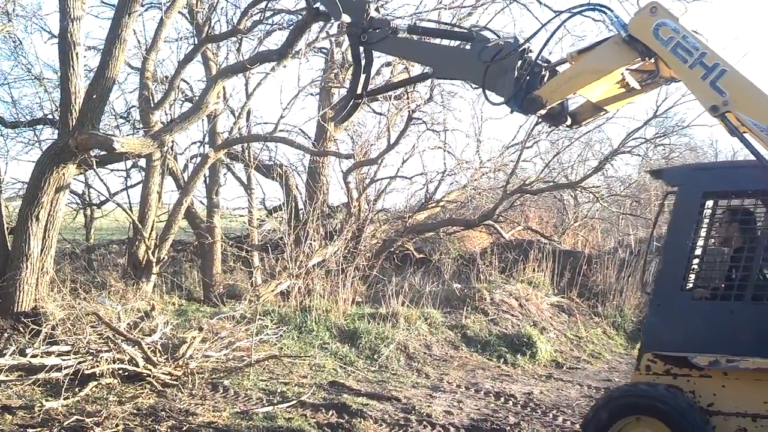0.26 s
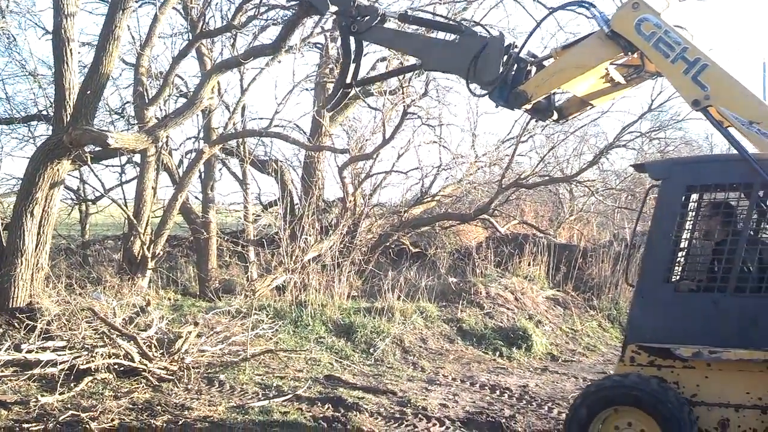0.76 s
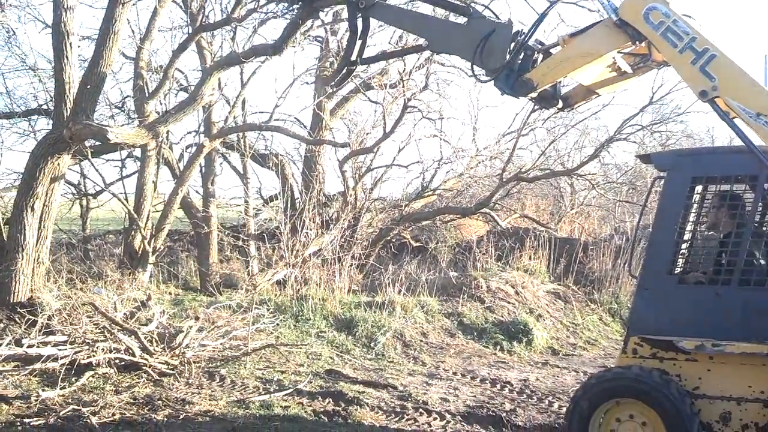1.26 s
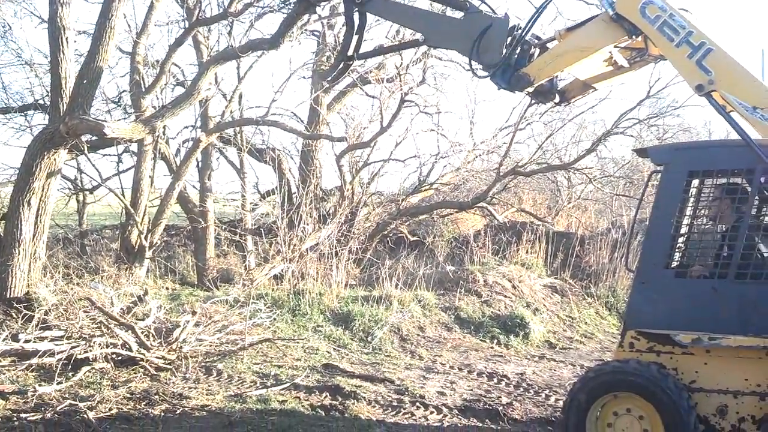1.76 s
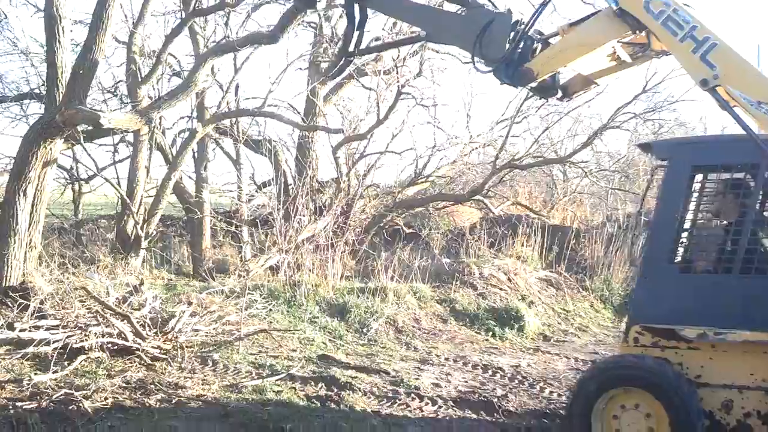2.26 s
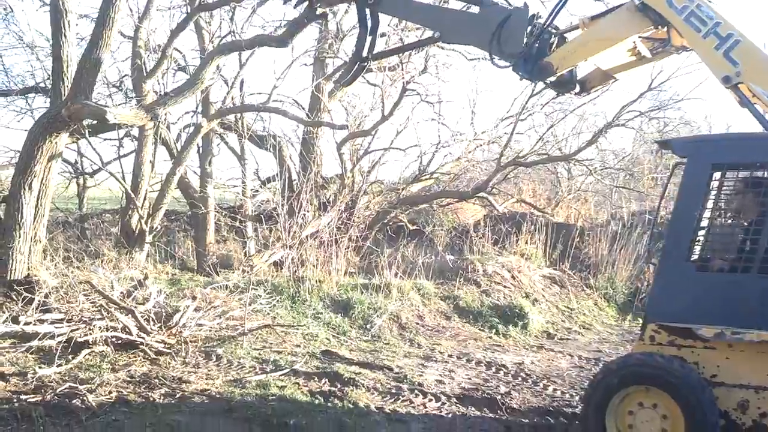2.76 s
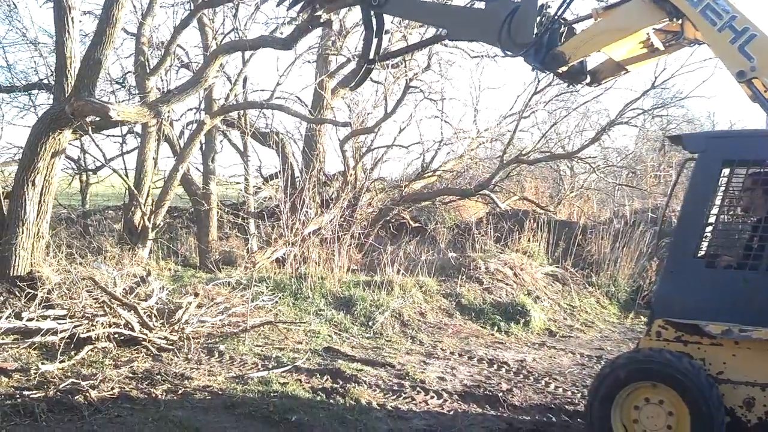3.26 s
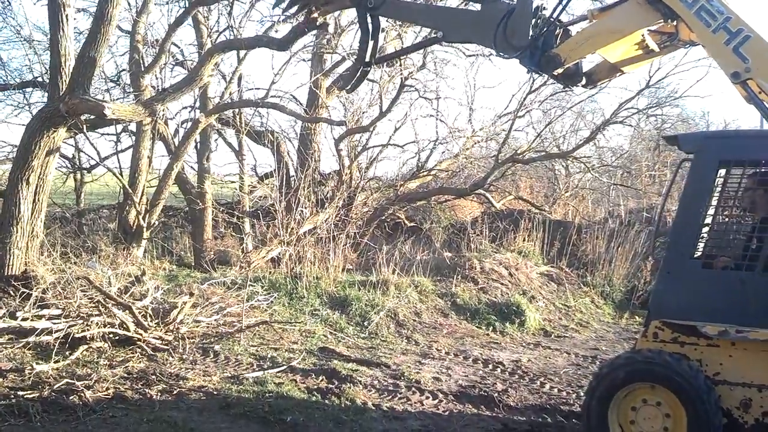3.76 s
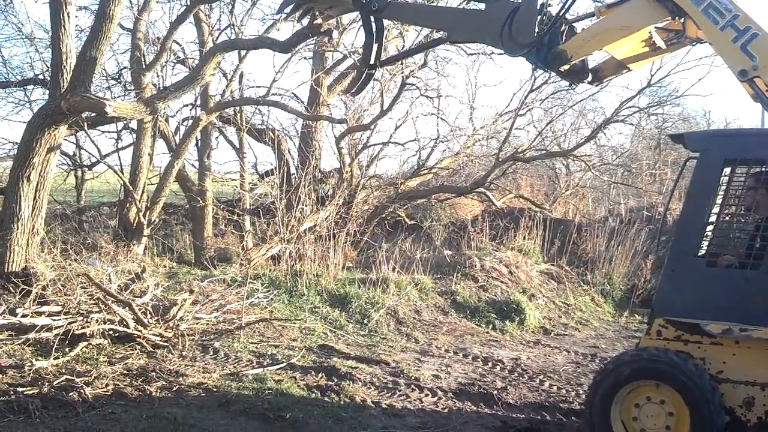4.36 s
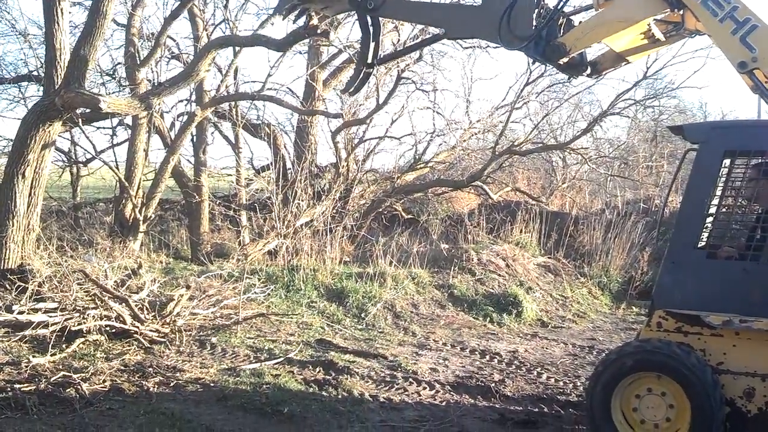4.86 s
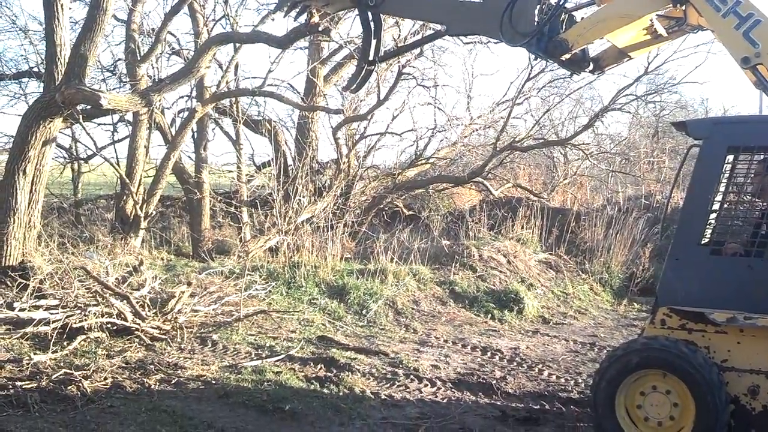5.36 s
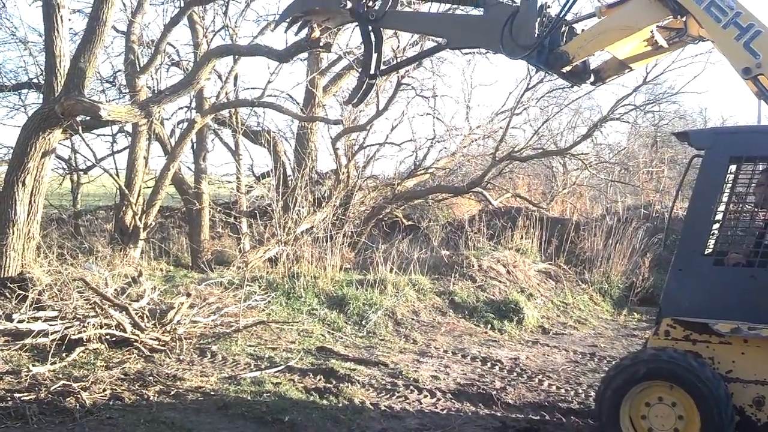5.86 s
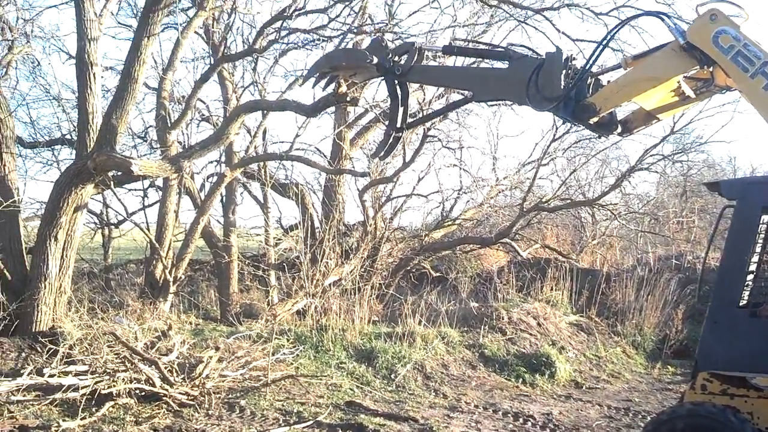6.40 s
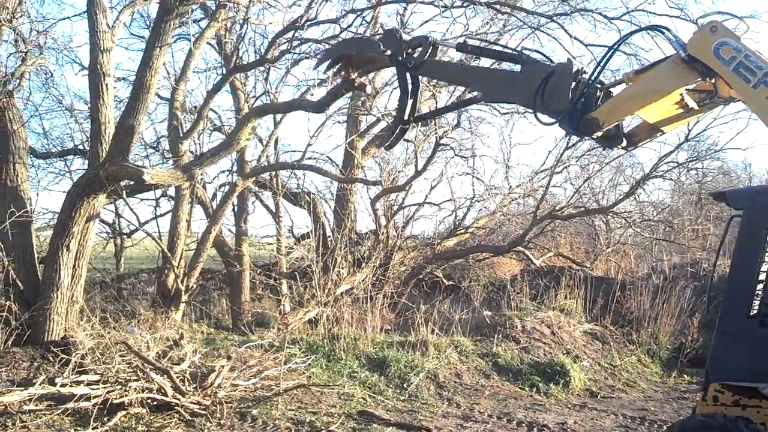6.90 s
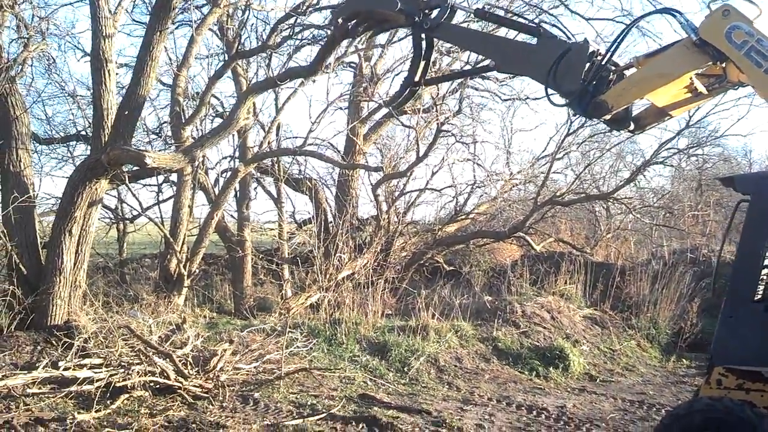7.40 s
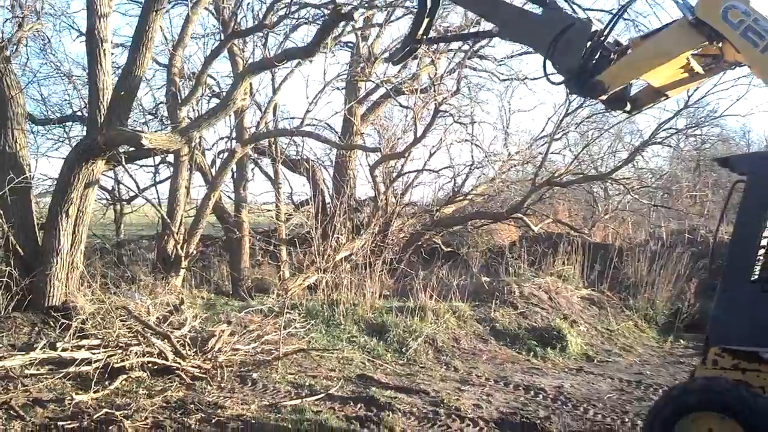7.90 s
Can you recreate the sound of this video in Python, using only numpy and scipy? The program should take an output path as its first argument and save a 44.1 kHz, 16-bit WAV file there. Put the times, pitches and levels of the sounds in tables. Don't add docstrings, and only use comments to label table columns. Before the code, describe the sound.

Outdoors, a few metres from a small stereo camera microphone, a four-cylinder diesel loader throbs and roars throughout. Hydraulics whine as its arm moves and the steel claw clanks early on. Then dead branches snap and crack in a dense burst, the engine dipping in level after each loud peak. Breakage thins to small twig ticks, then one late clank with a snap, and the hydraulic whine rises again. Light wind buffets the microphone.

```python
import sys
import numpy as np
from scipy import signal
from scipy.fft import rfft, irfft
from scipy.io import wavfile
from scipy.ndimage import uniform_filter1d

SR = 44100
rng = np.random.default_rng(int(sys.argv[2]) if len(sys.argv) > 2 else 0)


def inscribe(sig):
    pcm = np.round(np.clip(np.atleast_2d(sig).T, -1, 1) * 32767)
    wavfile.write(sys.argv[1], SR, pcm.astype(np.int16))


def boost_factor(decibels):
    exponent = np.asarray(decibels, float) / 20
    return 10 ** exponent


N = 358974
HZ = np.fft.rfftfreq(N, 1 / SR)


def evened(x):
    return x / np.sqrt(np.mean(x ** 2) + 1e-20)


def read(points, hz, column=1):
    table = np.transpose(points)
    return np.interp(np.log(hz + 1), np.log(table[0] + 1), table[column])


def along(rows):
    s, *columns = np.transpose(rows)
    return [np.interp(np.arange(N) / SR, s, c) for c in columns]


def coloured(x, points):
    return irfft(rfft(x) * boost_factor(read(points, HZ)), N)


def drift(hz):
    grid = np.arange(0, N + 128, 128)
    f = np.fft.rfftfreq(len(grid), 128 / SR)
    slow = irfft(rfft(rng.standard_normal(len(grid))) / (1 + (f / hz) ** 4), len(grid))
    return np.interp(np.arange(N), grid, evened(slow))


def tone(hz):
    return np.sqrt(2) * np.sin(2 * np.pi * (np.cumsum(hz) / SR + rng.random()))


def add(mix, s, sound):
    part = mix[..., round(s * SR):][..., :sound.shape[-1]]
    part += sound[..., :part.shape[-1]]


# time in seconds, depth in dB.
DUCKS = [(0, 2), (0.678, 1.5), (.845, 4.5), (1.29, 3), (1.73, 2.5), (1.76, 4), (1.796, 6.5), (2.047, 6),
         (2.45, 4), (2.59, 15.5), (3.16, 14), (3.412, 16), (3.98, 17), (4.475, 15.5), (4.92, 11),
         (6.85, 2.5), (7.116, 4.5), (7.45, 4)]


def ducking_db():
    t, gain_db = np.arange(N) / SR, np.zeros(N)
    for s, depth_db in DUCKS:
        since = np.maximum(t - s, 0)
        quick_db = 0.15 * depth_db * (1 - np.exp(-since / 0.054))
        climb_db = 8 * since
        gain_db = np.minimum(gain_db, (t >= s) * (quick_db + climb_db - depth_db))
    return uniform_filter1d(gain_db, size=400)


# start in seconds, length in seconds, level in dB.
PULLS = [
    (0, .5, -5),
    (.84, .58, 0),
    (1.6, .2, -5),
    (2.42, .27, 1),
    (3.03, .45, -2),
    (3.9, .9, -5),
    (5.95, .5, -6),
    (6.82, .47, 0),
    (7.3, .25, -6),
    (7.52, .7, -3.5),
]


def pull():
    t, rise_s = np.arange(N) / SR, .1
    return sum(boost_factor(db) * np.clip(np.minimum(t - s, s + length - t) / rise_s, 0, 1) for s, length, db in PULLS)


# time in seconds, exhaust tone in Hz (4 x shaft speed).
SPEED = [(0.0, 119.9), (0.91, 116.7), (1.36, 116.6), (1.59, 119.6), (2.56, 117), (3.02, 121.1),
         (3.19, 116.2), (3.42, 116.2), (3.56, 119.5), (3.83, 119.4), (3.97, 117.2), (4.71, 118.1),
         (4.85, 119.1), (6.55, 119.1), (6.89, 116.1), (7.42, 117.4), (7.85, 115.6), (8.14, 116.5)]


def crank():
    hz = along(SPEED)[0]
    return hz, np.cumsum(hz / 2) / SR


# multiple of half the exhaust tone, level in dB.
ORDERS_DB = [(1.001, -20.5), (1.251, -20.5), (2.75, -14), (3, -10), (3.25, -10), (3.499, -18), (4, -4),
             (4.251, -13.5), (4.75, -13.5), (5, -10), (5.249, -30), (5.75, -6), (6, -4), (6.249, -5),
             (6.498, -7)]


def exhaust(roar_db, hz, firing):
    sag_hz = 119 - hz
    tone_db = roar_db - 3.5 + 0.16 * sag_hz + 1.4 * drift(hz=1.15)
    pipe_db = roar_db - 9 + 2.8 * np.clip(sag_hz - .8, 0, 3)
    lines = boost_factor(tone_db + 14.5) * tone(hz)
    for k, db in ORDERS_DB:
        booms = 2.4 < k < 5.4 and k != 4
        level_db = pipe_db + 18.5 if booms else roar_db + 6.0
        throb = 2.88 / k * np.cos(2 * np.pi * k * firing - k ** 2)
        lines += boost_factor(level_db + db + 2.8 * drift(hz=3)) * throb
    boom = np.cos(2 * np.pi * 3 * firing - 9)
    return lines + boost_factor(roar_db + 8.5) * pull() * boom


# frequency in Hz, level in dB per Hz.
ROAR = [(45, -31), (90, 4.5), (180, 12.5), (280, 13), (370, 10.5), (430, -3.5), (520, 2.5), (660, -4.5),
        (800, -4), (1000, -7), (1300, -15), (1550, -10), (1900, -17), (2600, -30.5)]
# frequency in Hz, level in dB per Hz.
HISS = [(1200, -39), (2000, 12), (3000, 7.5), (4000, 9), (6000, 4.5), (8000, -4), (12000, -33),
        (16000, -38.5)]
# pitch in Hz at 119 Hz exhaust tone, level in dB over the roar.
GEARS = [(598, -12), (629, -13), (780, -12), (882, -14), (1034, -14), (1140, -8), (1199, -7), (1496, -8),
         (1555, -14), (4075, -19)]
# frequency in Hz, level in dB over the roar.
PANELS = [(1410, -10), (1632, -10), (1696, -15)]
# frequency in Hz, width in Hz, level in dB.
CASING = [(570, 130, -7), (797, 60, -3), (1140, 70, -11), (1490, 110, -5), (1640, 70, -6), (4200, 460, -12)]


def block(roar_db, hz, firing):
    strength = boost_factor(1.7 * rng.standard_normal(600))[firing.astype(int)]
    swell = strength * np.exp(-(firing % 1) / 0.48)
    cycle = np.interp(firing / 4 % 1, np.linspace(0, 1, num=3000), rng.standard_normal(3000))
    noise = rng.standard_normal((2, N))
    noise[0] += .85 * evened(cycle)
    roar = evened(coloured(noise * (1 + 0.46 * swell), ROAR))
    hiss = evened(coloured(rng.standard_normal((2, N)) * (1 + 0.62 * swell), HISS))
    roar = coloured(roar, [(140, 0), (170, -7), (390, -8), (440, 0)])
    gears = np.zeros(N)
    for f, db in GEARS:
        gears += boost_factor(db - 20 + 3.5 * drift(hz=4)) * tone(f * hz / 119 + 1.2 * drift(hz=8))
    roar[0] += (1 - .6 * np.minimum(pull(), 1)) * gears
    for f, db in PANELS:
        roar[0] += boost_factor(db - 22 + 3 * drift(hz=6)) * tone(f + 1.5 * drift(hz=8))
    casing = 1 + sum(boost_factor(db) / (1 + (2 * (HZ - f) / width) ** 2) for f, width, db in CASING)
    return boost_factor(roar_db) * irfft(rfft(boost_factor(6.5) * roar + boost_factor(-13.5) * hiss) * casing, N)


def engine(roar_db):
    hz, firing = crank()
    out = block(roar_db, hz, firing)
    out[0] += exhaust(roar_db, hz, firing)
    return out


# time in seconds, level in dB, pitch in Hz.
PUFFS = [(0.197, -22, 142), (0.82, -18, 167), (0.843, -16, 182), (0.898, -13, 182), (0.954, -15, 202),
         (1.286, -17, 147), (1.442, -17, 201), (1.729, -15, 152.9), (1.758, -14, 228), (1.798, -15.8, 159),
         (2.044, -15, 172), (2.938, -18, 122), (3.003, -19, 123), (3.045, -20, 164), (3.061, -18, 151.2),
         (4.07, -26, 216.2), (4.661, -25, 188.6), (4.752, -26, 152), (4.863, -20, 189.2),
         (4.987, -24, 143.4), (5.135, -24, 135), (5.172, -24, 139), (5.399, -18, 148), (5.537, -20, 143),
         (5.572, -21, 158), (5.786, -17, 151.8), (5.865, -21, 157.5), (5.934, -21, 138.8),
         (6.224, -19, 150), (7.449, -20, 157), (2.45, -17, 230), (1.665, -18, 200)]
# frequency in Hz, level in dB per Hz.
BREEZE = [(40, 0), (80, -4), (150, 6), (250, 0), (450, -14), (1000, -60)]


def wind(roar_db):
    t, out = np.arange(-900, 900) / SR, np.zeros((2, N))
    for s, db, hz in PUFFS:
        phase, port = rng.random(2)
        thump = np.exp(-(t * hz / 0.55) ** 2) * np.cos(2 * np.pi * (hz * t * (1 - 18 * t) + phase))
        push = np.roll([[1], [-.3]], int(2 * port))
        add(out, s - .02, boost_factor(db + 6.5) * push * thump)
    lumps = boost_factor(6.6 * np.minimum([drift(hz=8.1), drift(hz=21.0)], 1.4))
    breeze = evened(coloured(rng.standard_normal((2, N)), BREEZE) * lumps)
    calm_db = -7.5 * np.clip((np.arange(N) / SR - 6.3) / .2, 0, 1)
    return out + boost_factor(roar_db + 1.5 + calm_db) * breeze


def whine(rows, lift_db, rise_s, fall_s, settle_hz=0):
    clock, level, pitch = np.arange(N) / SR, np.zeros(N), np.zeros(N)
    for start, length, hz, glide, db in rows:
        t = clock - start
        shape = np.clip(np.minimum(t / rise_s, (length - t) / fall_s), 0, 1)
        level += shape * boost_factor(db + lift_db)
        pitch += (shape > 0) * (hz + glide * t + settle_hz * np.exp(-abs(t) / .09))
    return level * boost_factor(2.2 * drift(hz=30)) * tone(pitch + 1.3 * drift(hz=5))


# start in seconds, length in seconds, pitch in Hz, glide in Hz per second, level in dB.
LIFT = [
    (.11, .735, 541, -21, -32.5),
    (.851, .55, 526, -8, -44),
    (7.95, .4, 525, -20, -33),
]


def lift_pump():
    return whine(LIFT, lift_db=5.0, rise_s=0.21, fall_s=0.04)


# time of peak in seconds, level in dB, rise in seconds, fall in seconds.
RUSTLE = [(.8, -48.5, 2.5, 0.95), (1.1, -33, 0.027, 0.052), (2.44, -31, 0.034, 0.055),
          (2.6, -34, 0.075, 0.055), (2.65, -45, .05, 1.05), (3.19, -37, .07, 0.19),
          (3.29, -35.5, 0.04, 0.09), (3.48, -37.5, 0.17, 0.07), (3.985, -38, .015, .07),
          (4.03, -42, .04, .3), (4.486, -37, .01, .03), (4.93, -44, 0.93, 0.37), (5.14, -44.5, .2, 2.17),
          (6.05, -45, .03, .03), (7.12, -35, 0.018, 0.062), (7.3, -48, .1, 5)]


def rustle():
    t = np.arange(N) / SR
    swells_db = [db - 12 * np.maximum((s - t) / rise, (t - s) / fall) for s, db, rise, fall in RUSTLE]
    level = np.maximum(boost_factor(np.max(swells_db, axis=0)) - boost_factor(-51.0), 0)
    happens = rng.random(N) < 1100 / SR
    size = boost_factor(2.8 * np.minimum(rng.exponential(1, N), 3)) * happens
    grains = evened(signal.lfilter([1], [1, -.985], size)) * rng.standard_normal((2, N))
    colour = [(400, -13.5), (1200, 12.5), (3000, 1), (6000, 0.5), (10000, -4), (16000, -9)]
    return level * evened(coloured(grains, colour))


# start in seconds, length in seconds, pitch in Hz, glide in Hz per second, level in dB.
HOSE = [
    (.58, .84, 387.6, -11, -43.5),
    (6.45, 0.86, 382, -7.5, -50),
    (7.75, .4, 366, 8, -49),
]


def hose():
    return whine(HOSE, lift_db=6.5, rise_s=0.29, fall_s=0.066) * boost_factor([[0], [9]])


# start in seconds, length in seconds, pitch in Hz, glide in Hz per second, level in dB.
VALVE = [
    (.67, .76, 753, 6, -33),
    (2.33, 0.27, 765, -30, -35),
    (3.02, 0.42, 765, -55, -44),
    (3.95, .6, 758, -10, -49),
    (6.8, 0.12, 760, -30.5, -29.5),
    (7.5, .5, 872, -45, -45),
    (8.02, 0.42, 778, 30, -29),
]


def valve():
    return whine(VALVE, lift_db=-3.0, rise_s=0.086, fall_s=0.06, settle_hz=18)


# time in seconds, level in dB, share of the boom against the claw from 0 to 1.
CLANKS = [
    (0.675, -32.5, 0.46),
    (0.686, -40.5, 0),
    (1.003, -48, 0.1),
    (1.054, -42, 0.75),
    (2.443, -50, 0.1),
    (7.097, -37, 0.46),
    (7.111, -29, 0.68),
    (7.128, -36, 0.47),
    (7.16, -39.5, 0.8),
    (7.246, -41, 0.05),
]
# frequency in Hz, level in dB, time to fade by 60 dB in seconds.
CLAW = [(1150, 11, 0.054), (1276, 9.5, 0.07), (1500, 10, 0.049), (1625, 6.5, 0.07), (2237, 7.5, 0.042)]
# frequency in Hz, level in dB, time to fade by 60 dB in seconds.
BOOM = [(510, 1, 0.09), (730, 4, 0.15), (760, 13.5, 0.14), (1054, 14.5, 0.036), (1261, -1, 0.15),
        (2385, -2, .07)]


def clanks():
    t, out = np.arange(9000) / SR, np.zeros(N)
    for s, db, share in CLANKS:
        share = np.clip(share, 0, 1)
        for modes, part in ((CLAW, 1 - share), (BOOM, share)):
            for hz, mode_db, t60 in modes:
                ring = boost_factor(db + mode_db - 60 * t / t60) * np.sin(2 * np.pi * (hz * t + rng.random()))
                add(out, s, part * ring * np.minimum(t / .003, 1))
    return out


# time in seconds, level in dB, pitch in Hz, time to fade by 60 dB in seconds.
KNOCKS = [(.676, -27, 1400, .06), (.677, -27, 1650, .07), (.68, -27, 1130, .08), (.682, -26, 860, .08),
          (1.004, -32, 2220, .06), (1.006, -24, 700, .1), (1.027, -25, 510, .06), (1.054, -22, 800, .05),
          (1.096, -22, 790, .06), (1.11, -28, 1500, .05), (1.233, -25, 760, .06), (2.429, -28, 1000, .04),
          (2.588, -20, 1280, .03), (2.593, -26, 1500, .03), (3.159, -35, 1300, .04),
          (3.303, -34, 1250, .07), (3.375, -33, 1700, .04), (3.41, -31, 1280, .04), (3.472, -35, 1200, .06),
          (3.979, -28, 1400, .03), (3.984, -27, 1680, .06), (4.481, -30, 1720, .05), (5.035, -35, 810, .06),
          (5.39, -29, 1140, .05), (7.114, -19, 800, .05), (7.117, -22, 350, .05), (7.16, -24, 720, .05),
          (7.125, -26, 760, .16), (7.242, -33, 1740, .04), (7.25, -34, 1900, .05), (7.273, -32, 1300, .04),
          (7.324, -30, 1230, .04)]


def knocks():
    t, out = np.arange(5000) / SR, np.zeros(N)
    for s, db, hz, t60 in KNOCKS:
        add(out, s, boost_factor(db - 60 * t / t60) * np.sin(2 * np.pi * hz * t) * np.minimum(t / .001, 1))
    return out


# time in seconds, peak in dB, thickness as woody over bright in dB, tick in dB.
SNAPS = [(1.093, -20, -8, 10), (4.482, -22, 12, 9), (2.4283, -31, 26, .6), (2.4432, -20, 2, 15),
         (2.5267, -26, -11, 12), (2.5597, -22.5, 2, 17), (2.5873, -14, 10, 22), (2.6037, -24, 9, 10),
         (2.7468, -31, 3, 15), (3.158, -17, 10, 15), (3.2011, -19, 4, 14), (3.2284, -28, 1, 11),
         (3.277, -21, 2, 12), (3.303, -25, 4, 17), (3.335, -24, 5, 12), (3.3721, -28, 5, 12),
         (3.41, -12.5, 14, 10), (3.445, -31, 8, 10), (3.4719, -36, 12, 6), (3.9783, -18, 14, 10),
         (4.0128, -22, -2, 12), (4.4739, -20, 0, 15), (4.9076, -27, -10, 17), (4.939, -24.5, 0, 8.5),
         (5.036, -29, -8, 20), (3.515, -44, 16, 1), (7.117, -31, 26, 10), (5.3915, -26, 14, 13),
         (6.342, -26, -12, 14), (7.1629, -26, 8, 15)]
# time in seconds, peak in dB.
TWIGS = [(1.3194, -42), (2.5464, -39), (2.8288, -42.5), (3.1188, -43.5), (3.179, -44), (3.2364, -39),
         (3.268, -45), (3.931, -44), (3.9726, -38.5), (4.072, -40), (4.124, -46), (4.464, -43),
         (4.574, -56), (6.035, -40), (4.7323, -48), (4.7744, -42), (4.8354, -39), (5.1212, -39),
         (5.611, -33.5), (5.6842, -36), (6.05, -41)]


def snaps():
    t, parts = np.arange(5000) / SR, np.zeros((3, 2, N))
    twigs = [(*twig, -13, 15) for twig in TWIGS]
    for s, db, thick_db, tick_db in SNAPS + twigs:
        narrow_db = 0.82 * (db + 37.5)
        body_db, edge_db = thick_db / 2 - narrow_db, -thick_db / 2 - narrow_db
        t60 = max(.045 + .001 * thick_db, .015)
        fade = boost_factor(-60 * t / t60) + .13 * boost_factor(-12 * t / t60)
        burst = rng.standard_normal((2, len(t))) * fade
        burst *= boost_factor(3.2 * rng.standard_normal(100) - 1).repeat(50)
        tick = np.exp(-t[:40] / .00025) * np.cos(2 * np.pi * 3000 * t[:40])
        burst[0, 20:60] -= boost_factor(tick_db - 10) * tick
        for part, rel_db, loss in zip(parts, (body_db - 0.5, 0, edge_db + 6.0), (0, 8, 22)):
            add(part, s + .0006, boost_factor(db + rel_db - 6.5 - loss * t / t60) * burst)
    body = coloured(parts[0], [(300, -10), (800, 10.5), (1800, 9.0), (2600, -20.0)])
    middle = coloured(parts[1], [(1400, -15), (2300, -14), (5000, 0), (6500, -14)])
    bright = coloured(parts[2], [(4500, -21), (6000, -2.5), (16000, -15)])
    return body + middle + bright


# time in seconds, peak in dB.
CRACKS = [(2.4289, -18), (2.5278, -23), (2.5606, -14), (2.5889, -5), (2.7468, -30), (3.1205, -26),
          (3.1591, -15), (3.1629, -22), (3.199, -23), (3.2023, -16), (3.2289, -25), (3.2788, -16),
          (3.3027, -19), (3.3345, -24), (3.374, -26), (3.4111, -9), (3.4152, -20), (3.4463, -25),
          (3.9314, -29), (3.9741, -21), (3.9795, -11), (3.9839, -18), (4.0137, -16), (4.0725, -24),
          (4.1258, -33), (4.4657, -28), (4.4754, -14), (4.484, -18), (4.5277, -35), (4.6304, -33),
          (4.8365, -23), (4.9099, -21), (4.9392, -23), (5.0369, -21), (5.1234, -26), (5.3918, -22),
          (5.6113, -24), (6.3419, -19), (7.116, -17), (7.1629, -24)]


def cracks():
    t, out = np.arange(-40, 400) / SR, np.zeros(N)
    for s, db in CRACKS:
        spread, phase = rng.random(2)
        hz = (6400 - 185 * (db + 25)) * (.85 + .3 * spread)
        pulse = -np.exp(-(t * hz / .38) ** 2) * np.cos(2 * np.pi * hz * t + .4 * phase)
        tail = .2 * (t > 0) * np.exp(-abs(t) / .0012) * rng.standard_normal(len(t))
        add(out, s - 48 / SR, boost_factor(db + 3.5) * (pulse + tail))
    out = coloured(out, [(500, -20), (1500, 0), (9000, 4.5), (11500, -5), (16000, -8)])
    return np.outer([1, -.25], out)


# frequency in Hz, level in dB, likeness from 0 to 1, phase in radians.
PORTS = [(60, 0.5, 0.37, 0.1), (151, -14.5, 0.96, -1.1), (373, -15, 0.68, -0.33), (530, -7.5, 1, 0),
         (1030, -3.5, 0.17, -1.3), (1930, -1, 1, 0.1), (2630, 0, 0.2, -1.2), (4650, -1.5, 1, 0.23),
         (8880, 2.5, 1, 0.1), (13900, -0.5, 0.8, 2.5)]


def ports(pair):
    sound, twin = rfft(pair)
    like = np.clip(read(PORTS, HZ, column=2), 0, 1)
    turned = sound * np.exp(1j * read(PORTS, HZ, column=3))
    difference = irfft(boost_factor(read(PORTS, HZ)) * (like * turned + np.sqrt(1 - like ** 2) * twin), N)
    return pair[0] + np.array([difference, -difference])


def scene():
    roar_db = -30.5 + ducking_db()
    pair = engine(roar_db) + rustle() + hose() + snaps()
    pair[0] += lift_pump() + valve() + clanks() + knocks()
    return ports(pair) + cracks() + wind(roar_db)


def band_limit(x):
    return signal.sosfilt(signal.butter(12, 17000, fs=SR, output="sos"), x)


# frequency in Hz, level in dB.
MIC = [(1800, -4), (2300, -0.5), (2800, 8.5), (3300, 0), (7000, -2), (10300, -5.5), (12500, -3), (13800, 4),
       (15800, -0.5)]


def record(dry):
    x = coloured(dry, MIC)
    x = x - 0.9 * np.roll(x[::-1], 16, axis=1)
    x = irfft(rfft(x) * np.where(HZ < 15850, 1, boost_factor(-38)), N)
    return band_limit(x)


dry = scene()
out = record(dry)
inscribe(out)
```